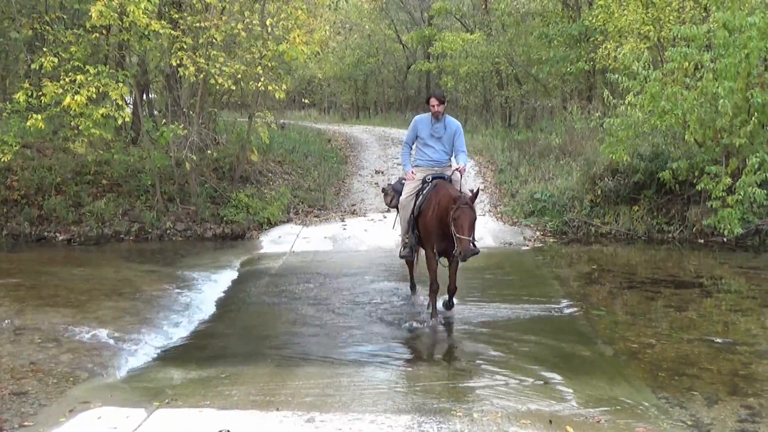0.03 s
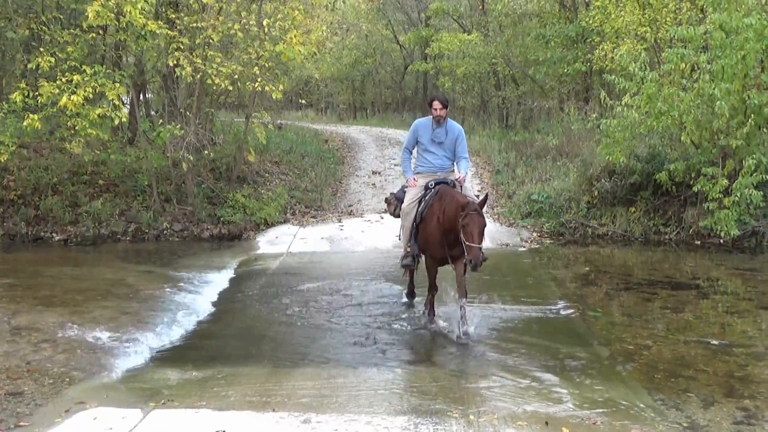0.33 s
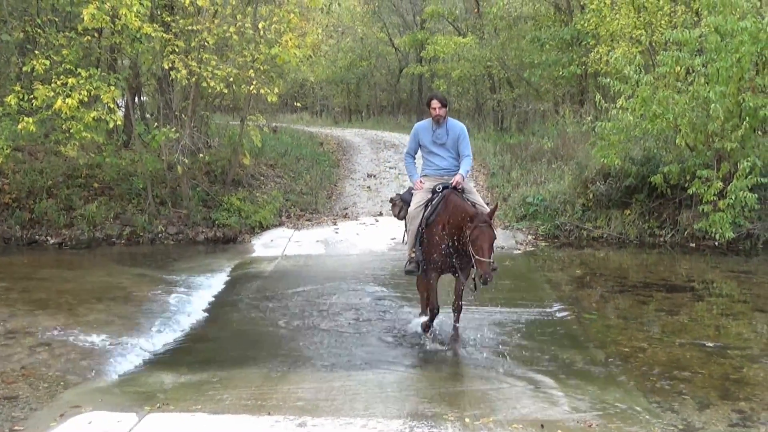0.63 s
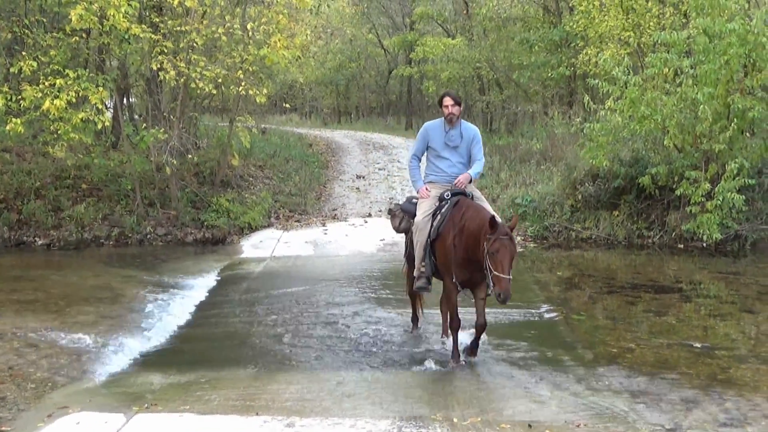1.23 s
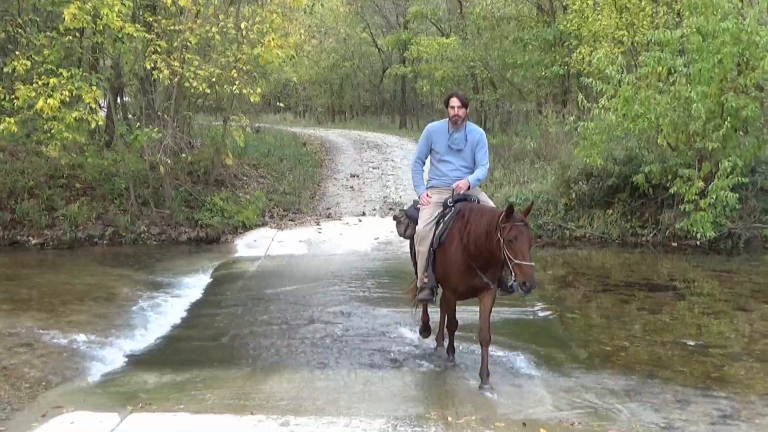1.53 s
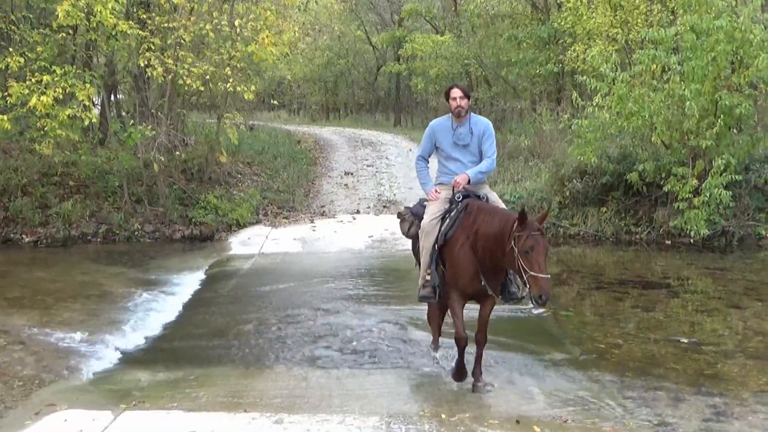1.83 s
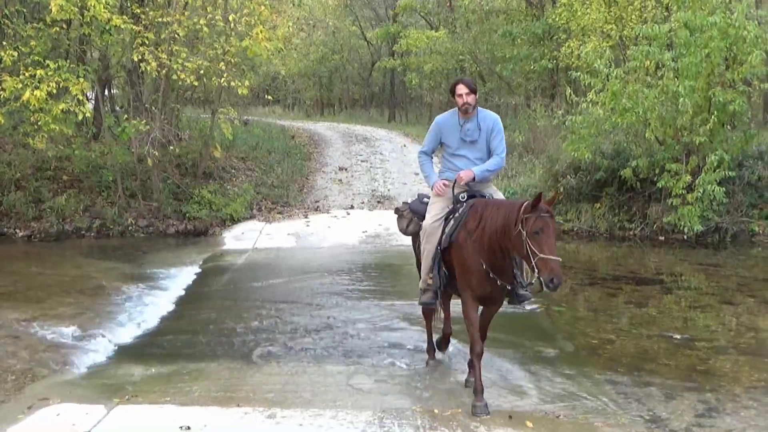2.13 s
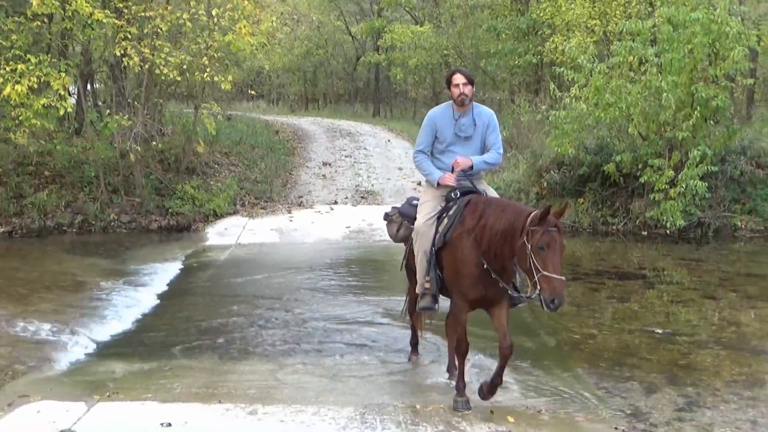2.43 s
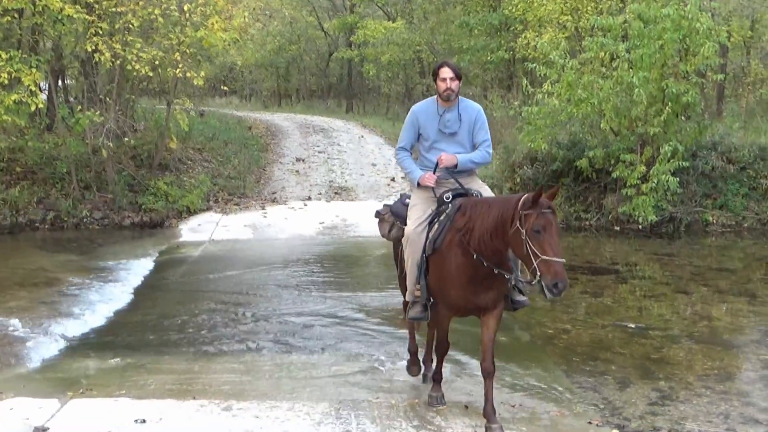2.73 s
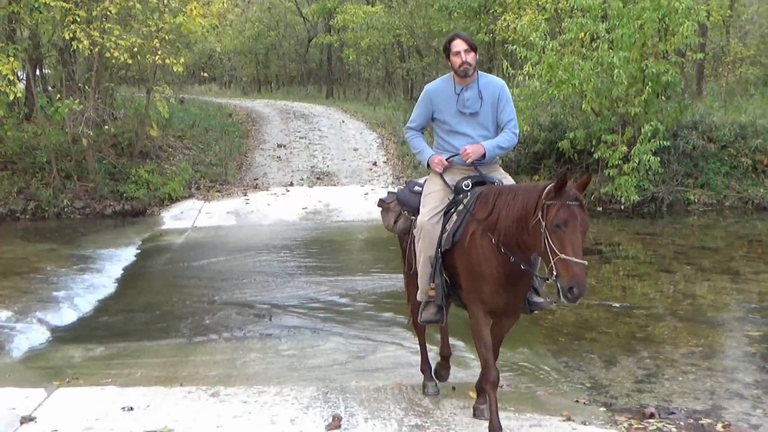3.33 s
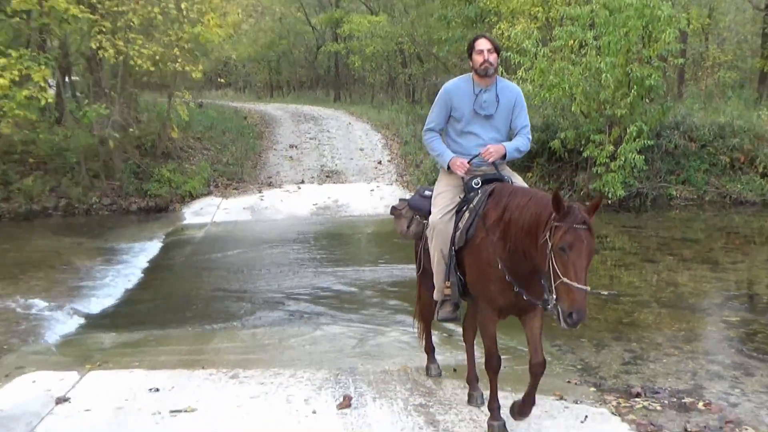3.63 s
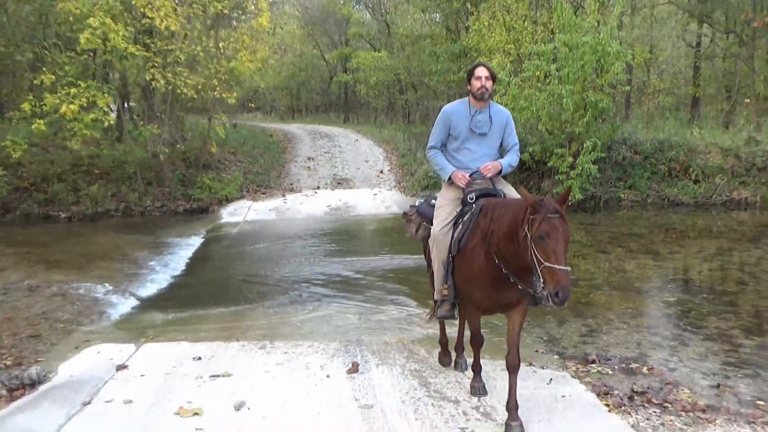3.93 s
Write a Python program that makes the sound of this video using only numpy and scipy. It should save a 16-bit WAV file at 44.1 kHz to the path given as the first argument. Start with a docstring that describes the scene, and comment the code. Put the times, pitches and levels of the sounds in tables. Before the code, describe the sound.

A horse wades through shallow running water, hooves splashing and clopping on concrete.

```python
"""A creek spills over the edge of a shallow concrete ford while insects trill faintly in the woods.
From the first moment a horse wades towards the listener: hooves plunge, knock hollow on the slab, thud,
grind grit and spit water, and the legs stir up bubbles and spray. From one second on, big drops slap down.
Past halfway the plunges and splashes end; a shoe clinks on a pebble, the churning dies away
and the horse steps out at the near edge."""
import sys
import numpy as np
from scipy import signal
from scipy.fft import rfft, irfft
from scipy.io import wavfile
from scipy.ndimage import uniform_filter1d

SR = 44100
rng = np.random.default_rng(int(sys.argv[2]) if len(sys.argv) > 2 else 0)


def to_wav(sig):
    """Store sig (one row per channel, or 1-D mono) as 16-bit WAV at the path in sys.argv[1].

    Samples outside -1..1 are clipped; the rate is SR.
    """
    pcm = np.clip(np.atleast_2d(sig), -1, 1) * 32767
    pcm = np.round(pcm).astype(np.int16)
    wavfile.write(sys.argv[1], SR, pcm.T)  # frames by channels


N = 176400
T = np.arange(N) / SR
HIT_T = T[:SR // 8]

# toe, heel and scuff hits (time [s], hollow pitch [Hz], ring t60 [s], knock [dB], grit [dB], spray [dB])
HOOF_HITS = [ (.078, 1160, 0.051, -26, -36, -45), (0.2346, 1023, 0.018, -21.5, -32.5, -49),
             (0.255, 1130, 0.012, -23, -36, -31), (.527, 970, 0.05, -31, -34, -39),
             (0.8165, 545, 0.024, -16.5, -46, -34), (1.097, 775, 0.017, -22.5, -29.5, -47),
             (1.099, 1127, 0.046, -25.5, -37, -36), (1.356, 1350, 0.023, -31, -28, -33),
             (1.376, 1094, 0.016, -27.5, -28.5, -45), (1.3945, 1330, .015, -36, -21, -27),
             (1.633, 1080, 0.027, -38, -25, -27), (1.642, 1226, 0.023, -22.5, -31, -34),
             (1.647, 1140, 0.0084, -22.5, -21.5, -34), (1.829, 990, 0.025, -26, -26.5, -34),
             (1.92, 580, 0.02, -25.5, -36, -53), (1.9222, 1194, 0.019, -18.5, -47, -52),
             (2.197, 1130, 0.037, -25, -25.5, -37), (2.208, 1304, 0.034, -28.5, -26.5, -33.5),
             (2.3766, 1057, 0.018, -15, -42, -36), (2.418, 1440, 0.016, -27.5, -38, -37),
             (2.468, 1030, 0.044, -31, -30.5, -32), (2.479, 1580, 0.015, -30, -30, -36),
             (2.4937, 974, 0.0075, -19.5, -25.5, -45), (2.785, 1140, 0.016, -23.5, -29.5, -38),
             (2.7941, 1390, 0.0092, -24, -32, -35), (2.7984, 1090, 0.033, -26, -25, -31.5),
             (3.081, 1540, .02, -31, -33, -34), (3.3867, 1080, 0.0055, -20.5, -32, -28.5),
             (3.404, 1380, 0.012, -29.5, -36, -30.5), (3.5549, 1230, 0.018, -30.5, -30, -33.5),
             (3.562, 990, 0.013, -25, -39, -40), (3.6916, 1300, .02, -27, -31, -31),
             (3.702, 1300, 0.041, -27.5, -31, -42), (3.711, 1203, .025, -24, -31.5, -38),
             (3.837, 1270, 0.02, -28.5, -29, -27), (3.9814, 1310, 0.009, -28, -49, -51),
             (3.985, 1097, 0.062, -20, -24.5, -24.5)]
# modes of the hollow under a hoof (pitch [ratio], level [dB], t60 [ratio])
HOOF_MODES = [(1, 15.5, 0.89), (1.22, -10.5, 1), (.7, -9, 0.81)]
# the weight lands on a hoof under water (time [s], thud [dB], plunge [dB])
HEAVY_STEPS = [(.086, -46, -33), (0.257, -36.5, -48), (0.532, -43.5, -32), (0.815, -44, -27.5),
               (1.103, -41, -32.5), (1.376, -37, -39.5), (1.636, -41, -37), (1.921, -44, -25.5),
               (2.487, -43, -45)]
# modes of a shoe on a pebble (pitch [Hz], level [dB], t60 [s])
CLINK_MODES = [(3700, -3, 0.022), (3880, 0, 0.014), (4530, -3, 0.03)]
# EQ of crushed grit and of spat water (frequency [Hz], gain [dB])
GRIT_EQ = [(150, -15.5), (550, -4.5), (1400, -4.5), (2300, 5.5), (3200, -2), (4600, -2.5), (6000, -8),
           (10000, -43)]
SPRAY_EQ = [(600, -55), (2500, -3.5), (5500, -5), (8000, 5), (10500, 4.5), (13000, -8.5), (15500, -28)]
# how hard the legs stir the water (time [s], level [dB])
STIR_LEVELS = [(0, -38), (.6, -38), (1.35, -35), (1.95, -36.5), (2.5, -37.5), (3.3, -39.5), (4, -50)]
# sheets of spray kicked up by the legs (time [s], length [s], level [dB])
LEG_SPLASHES = [(0.124, 0.078, -38), (0.29, 0.18, -38.5), (0.696, 0.057, -35.5), (0.83, 0.29, -38),
                (1.21, 0.27, -34.5), (1.442, 0.25, -37.5), (1.807, 0.059, -33.5), (2.13, 0.087, -38.5),
                (2.397, 0.094, -35)]
# EQ of the large, medium and tiny bubbles (frequency [Hz], gain [dB])
GURGLE_EQ = [(80, -27.5), (520, -0.5), (800, -2), (1200, 9.5), (1900, 1)]
SPLATTER_EQ = [(200, -15), (1200, -2.5), (3600, 1.5), (5200, 4), (7000, -6.5)]
FIZZ_EQ = [(4000, -14), (8000, -0.5), (10000, 5), (12500, -2.5), (15500, -10.5)]
# big drops slap the water (time [s], level [dB])
DROP_SLAPS = [(1.0077, -23), (1.212, -30.5), (1.251, -29.5), (1.278, -30), (1.497, -29), (2.162, -32),
              (2.655, -29.5)]
# single bubbles trapped by a hoof (time [s], pitch [Hz], level [dB])
BUBBLE_PLOPS = [(.086, 753, -29), (1.3565, 4970, -28), (1.647, 2460, -24)]
# EQ of the creek's rush (frequency [Hz], gain [dB])
CREEK_EQ = [(40, -56), (80, -25), (170, -12.5), (300, -7), (520, -5), (750, 3.5), (950, -6), (1250, -0.5),
            (1750, -1.5), (2250, -0.5), (3300, -4), (4500, -7), (6400, -13), (9500, -7.5), (13500, -19.5),
            (15500, -38)]
# swell and ebb of the insects (time [s], level [dB])
TRILL_LEVELS = [(.6, -45), (1.5, -48), (2.5, -45.5), (3.1, -46.5)]

RISE_CYCLES = 0.86  # water cushions the attack: deep knocks swell more slowly
SNAP_RISE_S = 0.00033
CRACK_DB, CRACK_T60_S = 9, 0.0053  # the first bite of the shoe, above the crunch that follows
SLOSH_DB, SLOSH_LEAD_S = -13.5, 0.01
THUD_HZ, CLINK_S, CLINK_DB = 233, 3.4037, -21.5
PLOP_T60_S = 0.042  # at 1 kHz; small bubbles die sooner


def hooves():
    """Each hit rings the hollow under the hoof, crushes grit, spits spray and squeezes out water."""
    out, t = np.zeros(N), HIT_T
    squeeze = np.minimum(t / SLOSH_LEAD_S, 1) ** 2 * fade(np.maximum(t - SLOSH_LEAD_S, 0), t60=0.082)
    for s, hz, t60, knock_db, grit_db, spray_db in HOOF_HITS:
        rattle_noise, grit_noise, water_noise, grain_noise, slosh_noise = rng.standard_normal((5, len(t)))
        detunes = 1 + 0.33 * rng.standard_normal(len(HOOF_MODES))
        ring = sum(undb(db) * np.sin(2 * np.pi * hz * ratio ** detune * t) * fade(t, t60 * share)
                   for (ratio, db, share), detune in zip(HOOF_MODES, detunes))
        knock = band(ring * attack(t, RISE_CYCLES / hz) ** 2, hz / 2, 2 * hz)
        crunch = undb(2.5 * unit(uniform_filter1d(grain_noise, size=60))) * attack(t, SNAP_RISE_S)
        rattle = band(rattle_noise * crunch * fade(t, t60=0.053), 0.5 * hz, 1.4 * hz)
        bite = fade(t, t60=0.044) + undb(CRACK_DB) * fade(t, CRACK_T60_S)
        grit = colour(grit_noise, GRIT_EQ) * crunch * bite
        spray = colour(water_noise, SPRAY_EQ) * crunch * fade(t, t60=0.034)
        add(out, s, strike(knock, knock_db - 0.5) + strike(rattle, knock_db - 10.5))
        add(out, s, strike(grit, grit_db) + strike(spray, spray_db))
        slosh_hiss = unit(colour(slosh_noise, GRIT_EQ)) * undb(grit_db - 1)
        slosh_body = unit(band(water_noise, 0.71 * hz, 2.1 * hz)) * undb(knock_db - 12)
        add(out, s - SLOSH_LEAD_S, (slosh_hiss + slosh_body) * squeeze * undb(SLOSH_DB))
    return out


def thuds():
    """The horse's weight lands with a short, dull bump."""
    out, t = np.zeros(N), HIT_T
    for s, db, _ in HEAVY_STEPS:
        thud = band(rng.standard_normal(len(t)) * fade(t, t60=0.039), 0.7 * THUD_HZ, 1.36 * THUD_HZ)
        add(out, s, 2 * undb(db) * thud / np.abs(thud).max())
    return out


def shoe_clink():
    """A shoe catches a pebble and rings, brief and bright."""
    out, t = np.zeros(N), HIT_T
    ring = sum(undb(db) * np.sin(2 * np.pi * hz * t) * fade(t, t60) for hz, db, t60 in CLINK_MODES)
    add(out, CLINK_S, strike(ring * attack(t, SNAP_RISE_S), CLINK_DB))
    return out


def plunges(build_t60_s=0.098, tail_t60_s=0.14):
    """A sinking hoof drags air under: hollow bubbles build up to the impact and gurgle on after it."""
    swell = sum(undb(db) * fade(np.abs(T - s), np.where(T < s, build_t60_s, tail_t60_s))
                for s, _, db in HEAVY_STEPS)
    cloud = bubbles(480, 820, cycles=16.3, spread_db=2, glide=0.23, count=2000)
    return unit(band(cloud, 424, 1150)) * swell


def wading():
    """Bubbles follow the stirring legs; each splash swells and dies in fine spray and pattering drops."""
    stir = undb(np.interp(T, *np.array(STIR_LEVELS).T))
    splash = np.sqrt(sum(undb(2 * db) * np.abs(np.sin(np.pi * np.clip((T - s) / length, 0, 1)))
                         for s, length, db in LEG_SPLASHES))
    gurgle = bubbles(424, 1670, cycles=13, spread_db=3.5, glide=0.2, count=2600)
    splatter = bubbles(1237, 6120, cycles=18, spread_db=3.5, glide=0.14, count=5500)
    fizz = bubbles(4500, 13000, cycles=7.1, spread_db=2.5, glide=0.05, count=9500)
    layers = [(gurgle, GURGLE_EQ, stir * undb(-4)),
              (splatter, SPLATTER_EQ, np.hypot(stir * undb(-4), splash * undb(-4.5))),
              (fizz, FIZZ_EQ, np.hypot(stir * undb(-5), splash))]
    return sum(unit(colour(cloud, eq)) * gain * undb(wander(rate_hz=24.99)) for cloud, eq, gain in layers)


def bubbles(lo_hz, hi_hz, cycles, spread_db, glide, count, width=0.77):
    """A stereo cloud of ringing bubbles that chirp upwards, a few much louder than the rest."""
    out = np.zeros((2, N))
    for when, pitch, size, life, pan in rng.random((count, 5)):
        hz = lo_hz * (hi_hz / lo_hz) ** pitch
        t60 = cycles * (0.5 + life) / hz
        t = T[:int(t60 * SR) + 2]
        size_db = spread_db * min(-np.log(1 - size), 4)
        chirp = undb(size_db) * np.sin(2 * np.pi * hz * t * (1 + glide * t / t60 / 2)) * fade(t, t60)
        for channel, gain in zip(out, stereo(1, (pan - 0.5) * width)):
            add(channel, when * N / SR, chirp * gain)
    return out


def drops():
    """Falling drops land with short bright slaps; single trapped bubbles plink and plop."""
    out, t = np.zeros(N), HIT_T
    for s, db in DROP_SLAPS:
        slap = colour(rng.standard_normal(len(t)), SPRAY_EQ) * fade(t, t60=0.012)
        add(out, s, strike(slap, db))
    for s, hz, db in BUBBLE_PLOPS:
        ring = np.sin(2 * np.pi * hz * t) * fade(t, PLOP_T60_S * np.sqrt(1000 / hz))
        add(out, s, strike(ring * attack(t, RISE_CYCLES / hz), db))
    return out


def woods(steps, width=0.11, echo_db=-13.5):
    """The steps reach the two microphone ports a little out of phase, with a thin echo from the trees."""
    t = T[:SR // 2]
    tails = band(rng.standard_normal((2, len(t))), 210, 9900) * fade(t, t60=0.082) * attack(t, 0.0023)
    echo = np.array([signal.fftconvolve(steps, tail / np.linalg.norm(tail))[:N] for tail in tails])
    direct = stereo(steps, width * signal.hilbert(steps, 2 * N).imag[:N])
    return direct + undb(echo_db) * echo


def creek(level_db=-37, flicker_db=1.85):
    """A steady bed of water rushing over the ford's edge, each band flickering on its own."""
    rush, edges_hz = 0, np.geomspace(40, 16000, 10)
    for lo, hi in zip(edges_hz, edges_hz[1:]):
        mid, side = band(rng.standard_normal((2, N)), lo, hi)
        width = 0.33 if hi > 1500 else 0.132
        rush = rush + stereo(mid, width * side) * undb(flicker_db * wander(rate_hz=21.964))
    return unit(colour(rush, CREEK_EQ)) * undb(level_db)


def insects(pitch_hz=4257, half_band_hz=140):
    """A faint far trill from both banks that swells and ebbs."""
    mid, side = band(rng.standard_normal((2, N)), pitch_hz - half_band_hz, pitch_hz + half_band_hz)
    return unit(stereo(mid, 0.5 * side)) * undb(np.interp(T, *np.array(TRILL_LEVELS).T))


def undb(db):
    """Decibels to gain."""
    return 10 ** (np.asarray(db) / 20)


def unit(x):
    """Scale to rms 1."""
    return x / np.sqrt(np.mean(x ** 2))


def strike(x, db):
    """Set the level of the first 5 ms of a hit."""
    return x * undb(db) / np.sqrt(np.mean(x[:SR // 200] ** 2))


def attack(t, rise_s):
    """Exponential fade-in."""
    return 1 - np.exp(-t / rise_s)


def fade(t, t60):
    """Exponential decay by 60 dB in t60 seconds."""
    return np.exp(-np.log(1000) * t / t60)


def colour(x, eq):
    """Apply an EQ curve of (frequency [Hz], gain [dB]) points."""
    hz, db = np.array(eq).T
    bins_hz = np.fft.rfftfreq(x.shape[-1], 1 / SR)
    return irfft(rfft(x) * undb(np.interp(np.log(bins_hz + 1), np.log(hz), db)), x.shape[-1])


def band(x, lo_hz, hi_hz):
    """Causal band-pass."""
    sos = signal.butter(2, [lo_hz, min(hi_hz, SR / 2 - 1)], "band", fs=SR, output="sos")
    return signal.sosfilt(sos, x)


def wander(rate_hz):
    """Smooth random modulation of rms 1."""
    hold = int(SR / rate_hz)
    return unit(uniform_filter1d(np.repeat(rng.standard_normal(N // hold + 1), hold), hold)[:N])


def stereo(mid, side):
    """Left and right from mid and side."""
    return np.array([mid + side, mid - side])


def add(out, s, x):
    """Mix x into out from time s."""
    i = int(s * SR)
    out[i:i + len(x)] += x[:max(N - i, 0)]


def scene():
    """Steps and churning water up front, over a bed of creek and insects."""
    steps = hooves() + thuds() + shoe_clink() + drops()
    return woods(steps) + plunges() + wading() + creek() + insects()


def record(dry, low_cut_hz=125, high_cut_hz=15500):
    """The microphone thins the bass and cuts the top."""
    thin = signal.sosfilt(signal.butter(3, low_cut_hz, "high", fs=SR, output="sos"), dry)
    return signal.sosfilt(signal.ellip(10, 0.2, 80, high_cut_hz, fs=SR, output="sos"), thin)


dry = scene()
out = record(dry)
to_wav(out)
```